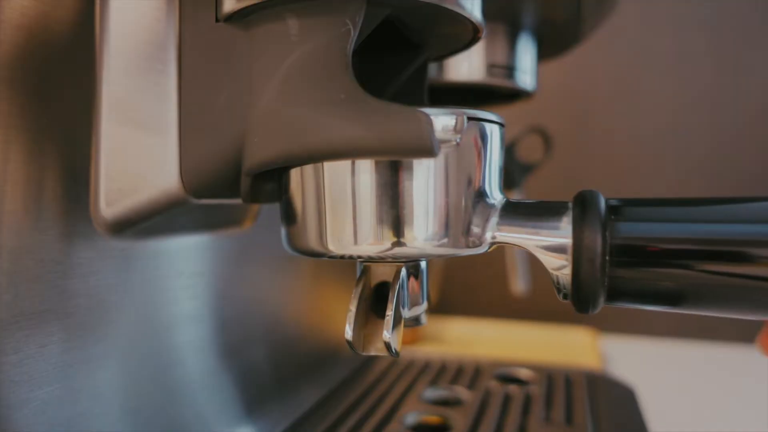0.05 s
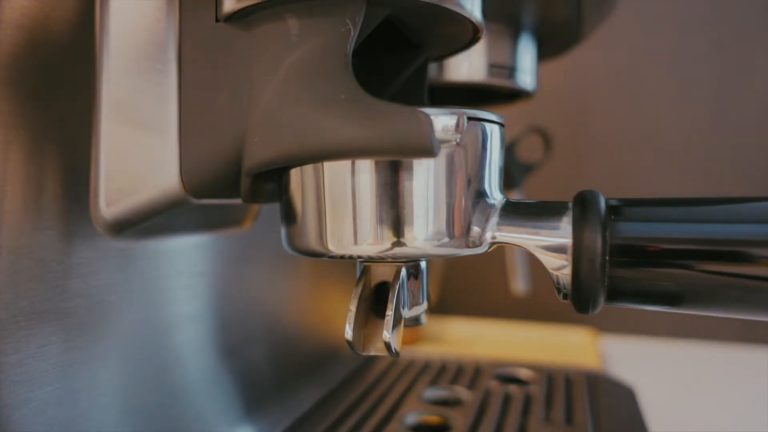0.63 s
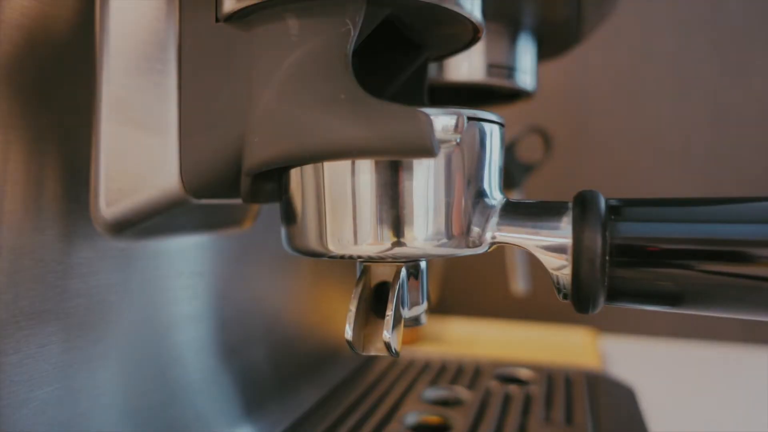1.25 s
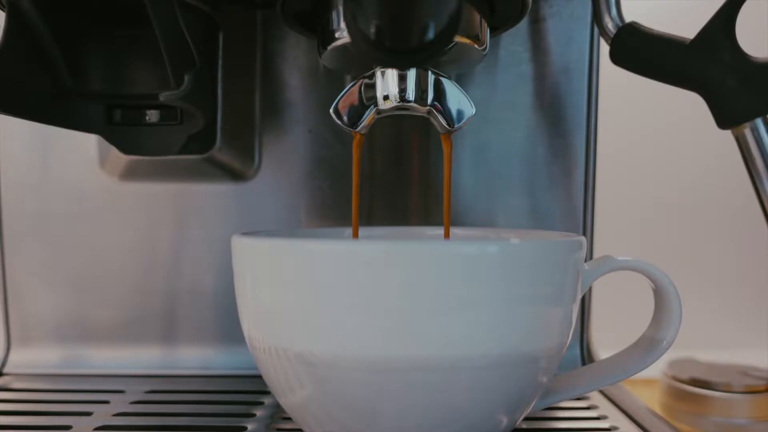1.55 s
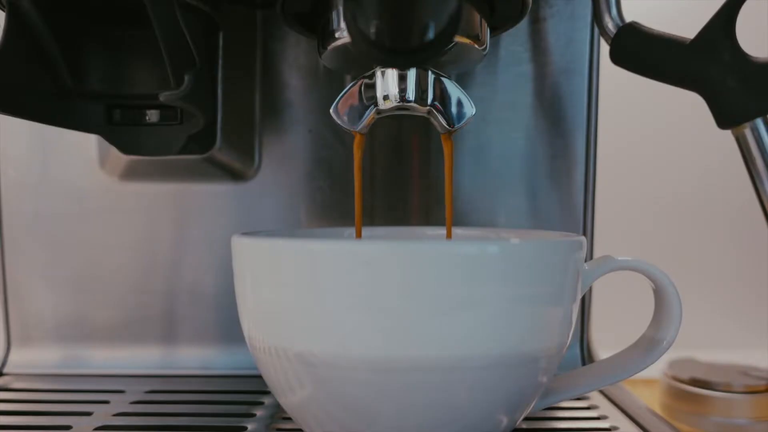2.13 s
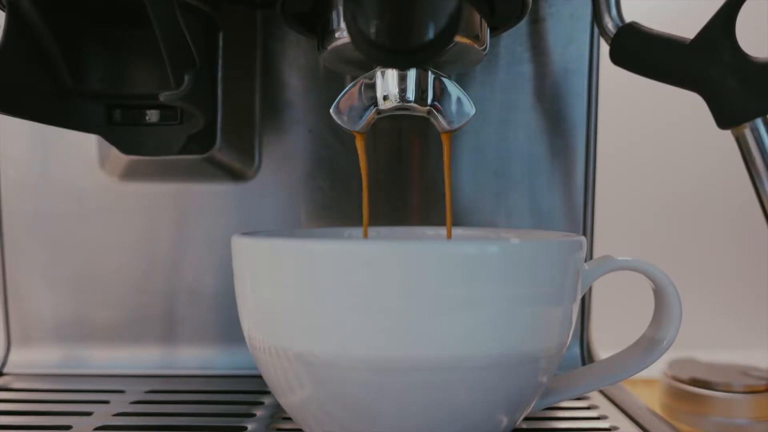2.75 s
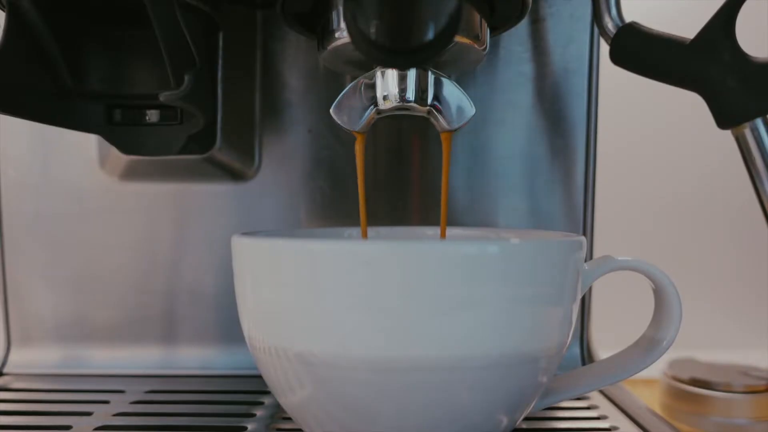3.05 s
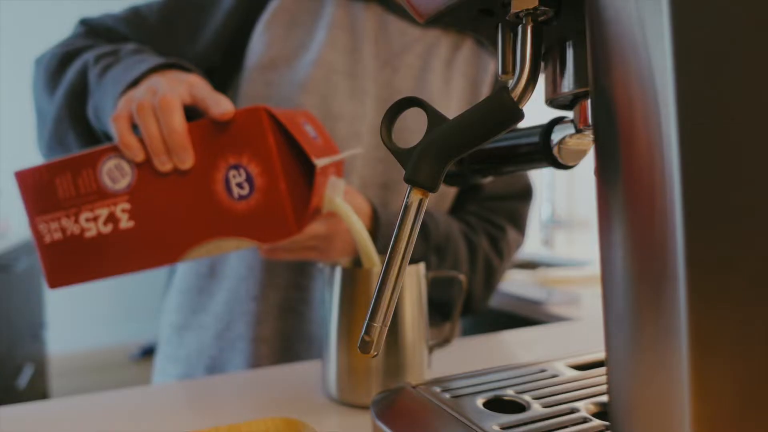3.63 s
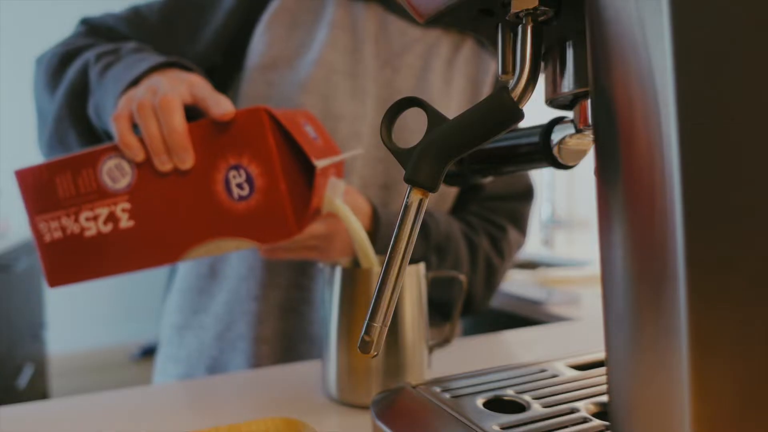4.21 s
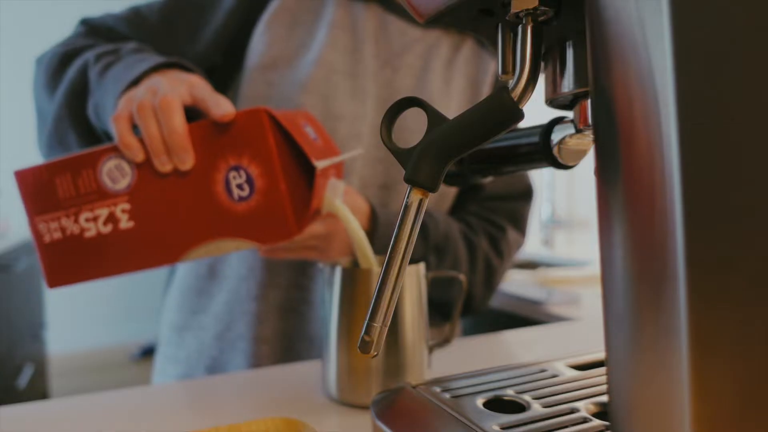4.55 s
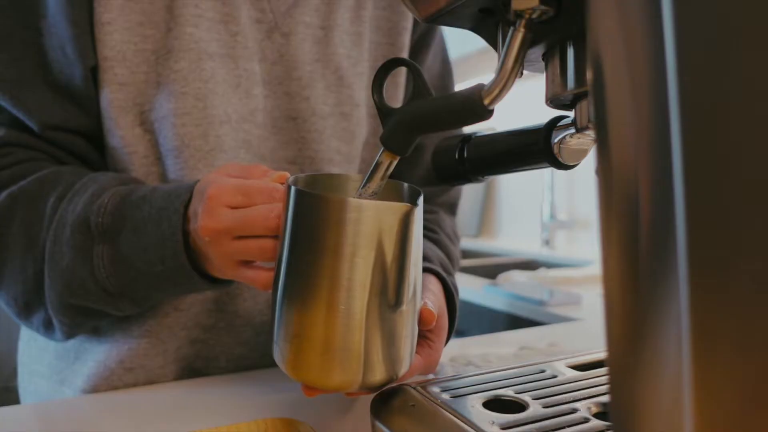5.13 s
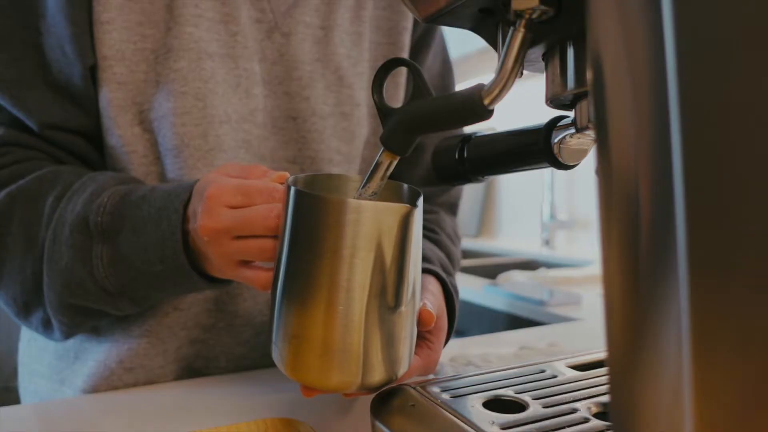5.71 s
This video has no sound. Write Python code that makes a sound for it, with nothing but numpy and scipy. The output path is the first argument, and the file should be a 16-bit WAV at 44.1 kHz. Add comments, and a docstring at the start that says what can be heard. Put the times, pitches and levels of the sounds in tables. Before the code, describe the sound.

An electric coffee grinder crunches beans loudly, its whine rising and then sagging. It cuts straight to an espresso machine pump, humming and lightly rattling while coffee plips into a cup. After another cut, milk glugs faintly into a steel jug. Finally a steam wand hisses and sputters in the milk, with two quick clusters of pump thumps. Everything is heard close up in a quiet kitchen.

```python
"""A kitchen with an espresso machine, where a milk coffee is made in four abruptly joined scenes.
Beans fracture between a grinder's burrs while its gears whine at their meshing rate. A vibration pump
drives its case at the mains frequency, and bubbles resonate in the filling cup. Milk glugs from a carton
into a steel jug. A steam jet hisses in the milk, collapsing bubbles ring the jug, and the pump feeds
the boiler in short thumps. The room rumbles faintly throughout."""
import sys
import numpy as np
from scipy import signal
from scipy.fft import rfft, irfft, next_fast_len
from scipy.io import wavfile
from scipy.ndimage import uniform_filter1d, map_coordinates

SR = 44100
rng = np.random.default_rng(int(sys.argv[2]) if len(sys.argv) > 2 else 0)


def file_out(sig):
    """Save sig as 16-bit WAV at sys.argv[1]."""
    # one column per channel
    cols = np.atleast_2d(sig).T
    # limit, then scale
    lim = np.clip(cols, -1, 1)
    pcm = np.round(lim * 32767).astype(np.int16)
    wavfile.write(sys.argv[1], SR, pcm)


N = 259037

# Span of a scene; the pour lies between brewing and steaming: (start [s], end [s])
GRINDING, BREWING, STEAMING = (0.00093, 1.473), (1.473, 3.304), (4.887, 5.9)
# Diffuse share of the sound field: (frequency [Hz], side minus mid [dB])
BREW_DIFFUSION = [(60, -38), (150, -29.5), (380, -17.5), (950, -16.5), (2380, -16), (5980, -9), (15000, -8)]
POUR_DIFFUSION = [(60, -24.5), (130, -28), (290, -14.5), (640, -1.5), (1410, 1), (3100, -7.5), (6820, -1),
                  (15000, -4.5)]
STEAM_DIFFUSION = [(60, -38), (220, -36), (400, -13.5), (700, -4.5), (1300, -19), (4400, -14), (8500, -4.5),
                   (11500, -11), (16000, -27.5)]


def grinder():
    """Brittle fracture of beans excites the housing; meshing gears radiate harmonics of the tooth rate."""
    # Gear speed, lower when beans load the burrs: (time [s], tooth rate [Hz])
    gear_speed = [(0, 421.8), (.14, 575), (.23, 775), (.5, 897.4), (.67, 896), (.74, 856), (.97, 857.4),
                  (1.13, 761), (1.48, 690.6)]
    # Radiation of a gear harmonic by the body: (frequency [Hz], level [dB])
    radiation = [(450, -32), (640, -31), (745, -21.5), (880, -21), (1000, -21), (1180, -27), (1450, -24),
                 (1600, -34), (2100, -33), (2450, -26), (2800, -25), (3000, -38), (3500, -35)]
    # Spectra of churning and cracking beans: (frequency [Hz], relative density [dB])
    churn_spectrum = [(30, -70), (55, -44.5), (96, -14), (183, -23), (260, -6.5), (345, -12), (480, -7),
                      (620, -4.5), (900, -3), (1250, -4.5), (2200, -13.5), (2900, -31.5), (4800, -86.5)]
    crunch_spectrum = [(800, -28), (1500, -6), (2000, -5), (2650, -3), (3100, -7.5), (4200, -7.5),
                       (5100, -5), (6200, -16), (8000, -19), (10000, -27), (13000, -29.5), (15500, -40.5)]
    # Housing resonances: (frequency [Hz], bandwidth [Hz], gain [dB])
    housing_modes = [(93.2, 7.7, -14.5), (271.3, 19, -1), (494.4, 26, -3), (1142, 63, -7.5)]
    # Diffuse share: (frequency [Hz], side minus mid [dB])
    diffusion = [(60, -38.5), (180, -31), (550, -19), (1650, -19), (4970, -21.5), (15000, -9.5)]
    full_mesh_hz, grip_s = 700, .013
    tooth_hz, = curves(gear_speed)
    bite = wobble(30.03)
    churn = amp(-21 + .5 * bite) * coloured(grains(rate=2700, spread_db=2, t60=.014), churn_spectrum)
    body = amp(-27 + 1.9 * wobble(22)) * resonate(grains(rate=400, spread_db=4, t60=.012), housing_modes)
    cracks = grains(rate=1700, spread_db=.5, t60=.026)
    crunch_db = -20 + 4 * np.log2(tooth_hz / tooth_hz.max())  # faster burrs crunch louder
    crunch = amp(crunch_db + 1.5 * bite + .26 * wobble(70)) * coloured(cracks, crunch_spectrum)
    tooth_hz = tooth_hz * (1 + .014 * wobble(28) + .008 * wobble(300))  # beans brake the burrs unevenly
    phase = 2 * np.pi * np.cumsum(tooth_hz) / SR
    # slow teeth mesh softly: the upper harmonics come in with speed
    soft_db = 27 * np.minimum(np.log2(tooth_hz / full_mesh_hz), 0)
    whine = np.zeros(N)
    for k in range(1, 5):
        harmonic_db = along(radiation, k * tooth_hz) + max(k - 2, -.5) * soft_db + 3.4 * wobble(40)
        whine += amp(harmonic_db) * np.sin(k * phase)
    whine *= np.clip(clock() / .11, 0, 1)  # swells as the gears take up the load
    whine *= unit(amp(-1.5 * bite))  # and dips at each hard bite
    envelope = (1 - np.exp(-clock() / grip_s)) * during(GRINDING, fade=.0044)
    return stereo((churn + body + crunch + whine) * envelope, diffusion, left_db=3)


def pump():
    """Forced vibration: a piston strikes once each mains cycle, so the case hums and loose parts rattle."""
    # Response of the case: (mains harmonic [1], gain [dB])
    case_harmonics = [(1, -15), (2, -19), (3, -13), (4, -18), (5, -10), (6, -2), (7, 0), (8, -1), (9, -1),
                      (10, -10), (11, -12), (12, -3), (13, -14), (14, -20), (15, -18), (16, -24), (17, -19),
                      (18, -17), (19, -19), (20, -21), (21, -25), (22, -14), (23, -16), (24, -14),
                      (25, -23)]
    # Flexing panels: (frequency [Hz], bandwidth [Hz])
    panel_modes = [(350, 70), (1050, 110), (1380, 140)]
    # Spectra of loose parts and of water forced through coffee: (frequency [Hz], relative density [dB])
    rattle_spectrum = [(1100, -27), (1550, -6), (2000, -3.5), (2750, -2), (3300, 1.5), (3850, -5),
                       (4400, -3), (5100, -6), (6000, -9), (8600, -8), (10500, -15), (14500, -36),
                       (16000, -34.5)]
    flow_spectrum = [(40, -13), (250, -9), (440, 0), (650, -6), (1000, -9), (1400, -7), (4000, -28)]
    # Metal fittings: (frequency [Hz], bandwidth [Hz], gain [dB])
    fitting_modes = [(1340, 95, 4), (1910, 120, -4), (3365, 52, -6.5), (3710, 52, -6), (5090, 43, -8),
                     (8050, 64, -16), (8640, 140, -18.5)]
    mains_hz, blow_lag_s, ease_db_per_s = 60.04, .0028, .8
    strokes = piston(mains_hz)
    case = [(30, -61.5)] + [(k * mains_hz, db) for k, db in case_harmonics] + [(1800, -33), (4000, -69)]
    blows = convolve(np.pad(-strokes, (round(blow_lag_s * SR), 0)), struck(case))
    hum = unit(all_pass(blows, panel_modes))  # each panel returns its share of the blow late
    t = clock(SR // 20)
    chatter = (1 - np.exp(-t / .0014)) ** 2 * amp(-60 * t / .062)
    repeating = unit(convolve(strokes, even(chatter * rng.standard_normal(len(t)))))
    repeating = filtered(repeating, lambda hz: 1 / np.hypot(1, (hz / 7000) ** 2))
    irregular = unit(convolve(strokes, chatter) * rng.standard_normal(N))  # new with every stroke
    rattle = coloured(repeating + amp(-5) * irregular, rattle_spectrum)
    fittings = resonate(convolve(strokes, chatter * rng.standard_normal(len(t))), fitting_modes)
    # as pressure builds, a loose steel tray joins in and the pump quietens
    tray = resonate(strokes, [(1410, 75, 0)]) * (1 - np.exp(-since(1.98) / .1))
    easing = amp(-ease_db_per_s * since(BREWING[0]))
    buzz = easing * (amp(-21) * hum + amp(-33.5) * rattle + amp(-39) * fittings + amp(-37.5) * tray)
    flow = amp(-37) * coloured(rng.standard_normal(N), flow_spectrum)
    return stereo((buzz + flow) * during(BREWING, fade=.0046), BREW_DIFFUSION, left_db=-2)


def piston(rate_hz):
    """Periodic impacts form a train of nearly equal, band-limited impulses."""
    times = .0039 + np.arange(int(N / SR * rate_hz)) / rate_hz
    sizes = amp(.2 * rng.standard_normal(len(times)))
    taps = np.floor(times * SR)[:, None] + np.arange(-7, 9)
    offset = taps - times[:, None] * SR
    pulses = sizes[:, None] * np.sinc(offset) * np.sinc(offset / 8)
    return np.bincount(taps.astype(int).ravel(), pulses.ravel(), N)[:N]


def coffee():
    """Air entrainment: falling coffee traps bubbles that resonate in the cup."""
    # Bubbles: (time [s], peak level [dB], frequency [Hz])
    plips = [(1.612, -24.5, 2440), (1.848, -28.5, 1110), (2.132, -20.5, 1520), (2.171, -23.5, 2120),
             (2.192, -17.5, 1960), (2.343, -15, 1910), (2.568, -28.5, 1860), (2.618, -22.5, 2090),
             (2.842, -22.5, 1600), (2.968, -22, 1760), (3.127, -18, 1330), (3.187, -27.5, 1300),
             (3.271, -22, 1430), (3.286, -16, 1504)]
    cup = np.zeros(N)
    for s, db, hz in plips:
        add(cup, s, amp(db) * bubble(hz, t60=.035, attack=.0011, rise=.047, splash=.55, splash_t60=.05))
    return (stereo(cup, BREW_DIFFUSION, left_db=4) + amp(-9) * room(cup)) * during(BREWING, fade=.006)


def steam():
    """Jet noise sputters at the wand's tip; bubble collapse excites the jug's modes; the milk rumbles."""
    # Spectra of the jet, the foam and the rumbling milk: (frequency [Hz], relative density [dB])
    jet_spectrum = [(2650, -32), (4500, -13.5), (5450, -10.5), (5840, -6), (7290, -5.5), (7980, -8.5),
                    (8830, -2), (10600, -6.5), (11100, -4.5), (12400, -7.5), (12900, -2), (14600, -5.5),
                    (15400, -6), (16000, -17.5)]
    froth_spectrum = [(450, -32), (640, -40), (740, -10), (830, -18), (1100, -12), (1300, -1.5), (1700, -2),
                      (2400, -8), (3000, -6), (4500, -2.5), (6000, -29.5)]
    boil_spectrum = [(24, -51), (40, -14), (129, -9), (161, 9.5), (200, -21.5), (311, -4.5), (452, -20),
                     (600, -29), (780, -50), (1320, -120)]
    # Resonances of the steel jug: (frequency [Hz], bandwidth [Hz], gain [dB])
    jug_modes = [(3023, 190, -1.5), (3425, 590, -2.5), (4023, 280, -0.5), (4250, 390, 1.5)]
    jug_db, jet_db = wand_levels()
    sputter = wobble(60)
    fizz = walls(grains(rate=6300, spread_db=3, t60=.005), t60=.042)
    jet = amp(jet_db + 1.1 * sputter) * coloured(fizz, jet_spectrum)
    foam = walls(grains(rate=1800, spread_db=5, t60=.0118), t60=.064)
    froth_db = (jug_db + jet_db) / 2 - 6.5 + .7 * sputter + .89 * wobble(30)
    froth = amp(froth_db) * coloured(foam, froth_spectrum)
    collapses = walls(grains(rate=1100, spread_db=0, t60=.011), t60=.041)
    ring = amp(jug_db + 1.3 * wobble(40)) * resonate(resonate(collapses, jug_modes), [(3700, 2200, 0)])
    boil = amp(-54.5 + 1.6 * wobble(14)) * coloured(rng.standard_normal(N), boil_spectrum)
    return stereo((jet + froth + ring + boil) * during(STEAMING, fade=.001), STEAM_DIFFUSION, left_db=0)


def wand_levels():
    """Jug and jet levels [dB]: near the surface the tip hisses more and couples less to the jug."""
    # Spurts of hiss: (centre time [s], duration [s], lift [dB])
    spurts = [(5.038, .05, 5.5), (5.12, 0.074, 7.5), (5.203, 0.045, 5.5), (5.324, 0.035, 6.5),
              (5.383, 0.029, 5.5), (5.506, 0.081, 5), (5.645, .09, 6.5), (5.761, 0.061, 8)]
    # Large collapsing bubbles that make the jug's ring flare: (time [s], lift [dB])
    collapses = [(4.932, 6), (5.158, 3.5), (5.227, 5.5), (5.405, 5), (5.431, 5.5), (5.49, 3), (5.685, 4.5)]
    flare_s, ease_off_s, fall_db_per_s = .018, 5.81, 140.5
    spurt_db = sum(db * .5 ** ((2 * (clock() - s) / length) ** 2) for s, length, db in spurts)
    flare_db = sum(db * (1 - np.exp(-since(s) / .002)) * np.exp(-(since(s) / flare_s) ** 2)
                   for s, db in collapses)
    fall_db = fall_db_per_s * since(ease_off_s)
    jug_db = -31 + flare_db - .4 * spurt_db - .77 * fall_db
    jet_db = -29.5 + spurt_db - fall_db
    return jug_db, jet_db


def boiler_feed():
    """Impact excitation: piston strokes in threes clack and leave the chassis in damped vibration."""
    # Strokes: (time [s], thump peak [dB], clack peak [dB])
    strokes = [(5.261, -26.5, -23), (5.276, -21, -17.5), (5.290, -17.5, -26), (5.777, -28, -27),
               (5.79, -19.5, -16.5), (5.806, -18.5, -23.5)]
    # Chassis resonances: (frequency [Hz], relative level [dB], t60 [s])
    chassis_modes = [(110.7, -13, 0.17), (194, -6, 0.115), (233.5, 5, 0.1), (259.8, 1.5, 0.22),
                     (305, -13, 0.024), (386, -14.5, 0.23)]
    # Clack resonances: (frequency [Hz], bandwidth [Hz], gain [dB])
    clack_modes = [(703, 43, 0), (1096, 170, -1.5), (1720, 390, -6.5), (2570, 900, -8)]
    thumps, t = np.zeros(N), clock(SR // 4)
    ring = sum(amp(db - 60 * t / t60) * np.sin(2 * np.pi * hz * t) for hz, db, t60 in chassis_modes)
    ring *= 1 - np.exp(-t / .0027)
    for s, thump_db, clack_db in strokes:
        clack = resonate(burst(.044), clack_modes)
        add(thumps, s, amp(thump_db) * unit_peak(ring) + amp(clack_db) * unit_peak(clack))
    return stereo(thumps, STEAM_DIFFUSION, left_db=.5)


def milk():
    """Bubble resonance over a thinning stream: the carton gulps air, and small bubbles decay sooner."""
    # Gulps and splashes: (time [s], peak level [dB], frequency [Hz], splash share [1])
    glugs = [(3.458, -49, 2570, .7), (3.508, -52, 2790, .4), (3.555, -42.5, 2730, 0.46),
             (3.597, -40.5, 2810, .5), (3.671, -50, 3600, 0.56), (3.747, -52, 2900, 0.34),
             (3.803, -32.5, 1774, 0.15), (3.826, -42, 2280, 0.5), (3.866, -48, 2570, .5),
             (4.074, -46.5, 5330, .15), (4.161, -52.5, 3040, .45), (4.589, -60, 3690, .35),
             (4.822, -54.5, 1685, .8)]
    # Milk running into the jug: (frequency [Hz], relative density [dB])
    stream_spectrum = [(500, -17), (900, 8.5), (1500, -1), (2700, 5.5), (4000, -11), (6500, -22),
                       (9000, -28), (16000, -38)]
    full_db, thin_db, settle_at_s, settle_s = -65.5, -78, 3.88, .25
    drops_per_s, drop_hz = 9, 4800
    start, end = BREWING[1], STEAMING[0]
    jug = np.zeros(N)
    for s, db, hz, splash in glugs:
        glug = bubble(hz, t60=85 / hz, attack=.0042, rise=.046, splash=splash, splash_t60=.066)
        add(jug, s, amp(db) * glug)
    stream_db = thin_db + (full_db - thin_db) * np.exp(-since(settle_at_s) / settle_s)
    loudest_gulp_s = max(glugs, key=lambda row: row[1])[0]
    slosh = amp(-53) * (1 - np.exp(-since(loudest_gulp_s) / .022)) * np.exp(-since(loudest_gulp_s) / .084)
    trickle = coloured(grains(rate=200, spread_db=6.5, t60=.095), stream_spectrum)
    stream = (amp(stream_db) + slosh) * during((start, end), fade=.01) * trickle
    # stray droplets grow fainter with the stream
    for when, size, pitch in rng.random((round(drops_per_s * (end - start)), 3)):
        s, hz = start + when * (end - start), drop_hz * 2 ** (pitch - .5)
        db = -61 + 8 * (size - .5) + np.interp(s, clock(), stream_db) - full_db
        add(jug, s, amp(db) * bubble(hz, t60=85 / hz, attack=.003, rise=.05, splash=.4, splash_t60=.04))
    return stereo(jug + stream, POUR_DIFFUSION, left_db=0) + amp(-15) * room(jug)


def bubble(hz, t60, attack, rise, splash, splash_t60):
    """A bubble is a damped oscillator of rising pitch, with a puff of spray around that pitch; peak 1."""
    t = clock(SR // 4)
    glide = 1 + rise * np.minimum(t / t60, 1)
    ring = np.sin(2 * np.pi * hz * np.cumsum(glide) / SR) * amp(-60 * t / t60)
    spray = resonate(resonate(burst(splash_t60), [(hz, hz * .4, 0)]), [(hz, hz * .5, 0)])
    return unit_peak(((1 - splash) * ring + splash * unit_peak(spray)) * (1 - np.exp(-t / attack)))


def kitchen():
    """Ambient noise: a low, nearly steady rumble fills the room."""
    # Rumble: (frequency [Hz], relative density [dB])
    rumble_spectrum = [(15, -67.5), (25, -40.5), (44, -17.5), (66, -18), (84, -22), (99, -11.5), (117, -11),
                       (185, -12), (223, -4.5), (394, -25.5), (754, -27), (988, -33.5), (1160, -28.5),
                       (2280, -42), (16000, -59)]
    rumble = amp(-51.5 + .76 * wobble(9)) * coloured(rng.standard_normal(N), rumble_spectrum)
    return stereo(rumble, POUR_DIFFUSION, left_db=2.5)


def room(x):
    """Reverberation: each frequency dies away at its own rate."""
    # Reverberation time: (frequency [Hz], t60 [s])
    decay_times = [(200, .3), (2000, 0.64), (10000, 0.13)]
    hz, t, noise = signal.stft(rng.standard_normal((2, SR // 2)), SR, nperseg=256)
    tail = signal.istft(noise * amp(-60 * t / along(decay_times, hz)[:, None]), SR, nperseg=256)[1]
    return signal.fftconvolve(x[None], tail / np.linalg.norm(tail[0]), axes=1)[:, :N]


def walls(x, t60):
    """Comb filtering by dense early reflections from close steel panels."""
    echoes = burst(t60, size=SR // 10)
    echoes[0] += 1.1 * np.linalg.norm(echoes)  # the direct path
    return convolve(x, even(np.pad(echoes, (SR // 400, 0))))


def stereo(x, diffusion, left_db):
    """Scattering decorrelates left and right; the treble leans to the nearer side."""
    scatter = rfft(burst(.023))
    scatter = np.roll(irfft(scatter / np.abs(scatter)), SR // 200)
    side = filtered(convolve(x, scatter), lambda hz: amp(along(diffusion, hz)))
    lean = lambda hz: amp(np.outer([.5, -.5], left_db * hz / (hz + 1200)))
    return filtered(np.array([x + side, x - side]), lean)


def grains(rate, spread_db, t60):
    """Shot noise: tiny random bursts, rate per second, add in energy; rms 1."""
    onsets = rng.random(N) < rate / SR
    energy = onsets * amp(spread_db * np.clip(rng.standard_normal(N), -2, 2)) ** 2
    envelope = np.sqrt(np.abs(convolve(energy, amp(-60 * clock(SR // 10) / t60) ** 2)))
    return unit(envelope * rng.standard_normal(N))


def burst(t60, size=SR // 4):
    """Exponentially decaying noise, 60 dB down after t60 seconds."""
    return rng.standard_normal(size) * amp(-60 * clock(size) / t60)


def resonate(x, modes):
    """Modal superposition: x through (frequency [Hz], bandwidth [Hz], gain [dB]) resonances; rms 1."""
    return unit(filtered(x, lambda f: sum((-1) ** k * amp(db) * 1j * f * w / (c * c - f * f + 1j * f * w)
                                          for k, (c, w, db) in enumerate(modes))))


def all_pass(x, modes):
    """Group delay around each (frequency [Hz], bandwidth [Hz]) mode, with no change of level."""
    return filtered(x, lambda f: np.prod([(c * c - f * f - 1j * w * f) / (c * c - f * f + 1j * w * f)
                                          for c, w in modes], axis=0))


def struck(spectrum, size=8192):
    """Minimum-phase impulse response of a body with this (frequency [Hz], gain [dB]) spectrum."""
    cepstrum = irfft(np.log(amp(along(spectrum, np.fft.rfftfreq(size, 1 / SR)))))
    cepstrum[1:size // 2] *= 2
    cepstrum[size // 2 + 1:] = 0
    return irfft(np.exp(rfft(cepstrum)))


def even(response, width_hz=500):
    """Whitening: an impulse response loses its broad colour and keeps its fine comb; energy 1."""
    spectrum = rfft(response)
    power = uniform_filter1d(np.abs(spectrum) ** 2, max(3, int(width_hz * len(response) / SR)))
    flat = irfft(spectrum / np.sqrt(np.abs(power) + 1e-20), len(response))
    return flat / np.linalg.norm(flat)


def coloured(x, spectrum):
    """Spectral shaping of x by (frequency [Hz], gain [dB]) points; rms 1."""
    return unit(filtered(x, lambda hz: amp(along(spectrum, hz))))


def filtered(x, response):
    """Linear filtering: the spectrum of x times a frequency response."""
    size = x.shape[-1]
    padded = next_fast_len(size + SR // 4)
    return irfft(rfft(x, padded) * response(np.fft.rfftfreq(padded, 1 / SR)), padded)[..., :size]


def convolve(x, response):
    """Convolution of x with an impulse response."""
    return signal.fftconvolve(x, response)[:N]


def add(track, s, sound):
    """Superposition of a sound on the track at time s."""
    part = track[round(s * SR):][:len(sound)]
    part += sound[:len(part)]


def wobble(rate):
    """Smooth random modulation, rate knots a second."""
    return map_coordinates(rng.standard_normal(int(N * rate / SR) + 4), [clock() * rate])


def during(span, fade):
    """A gate: 1 inside the span, 0 outside, with ramps of fade seconds."""
    return np.clip((clock() - span[0]) / fade + .5, 0, 1) * np.clip((span[1] - clock()) / fade + .5, 0, 1)


def along(points, hz):
    """Interpolation of (frequency [Hz], value) points on a log axis."""
    knots_hz, values = np.transpose(points)
    return np.interp(np.log(hz + 1), np.log(knots_hz + 1), values)


def curves(rows):
    """Interpolation of each column after the time, one value per sample."""
    times, *columns = np.transpose(rows)
    return [np.interp(clock(), times, column) for column in columns]


def clock(size=N):
    """Seconds at each sample."""
    return np.arange(size) / SR


def since(s):
    """Seconds elapsed after time s, 0 before it."""
    return np.maximum(clock() - s, 0)


def amp(db):
    """Decibels to gain."""
    return 10 ** (np.asarray(db) / 20)


def unit(x):
    """x at rms 1."""
    return x / np.sqrt(np.mean(x ** 2) + 1e-20)


def unit_peak(x):
    """x at peak 1."""
    return x / np.abs(x).max()


def scene():
    """Superposition of grinding, brewing, pouring and steaming on the room's rumble."""
    return grinder() + pump() + coffee() + milk() + steam() + boiler_feed() + kitchen()


def record(dry):
    """Band limiting: a fourth-order bass roll-off and a steep treble cut."""
    low_hz, top_hz = 38, 15850
    high_pass = lambda hz: hz ** 4 / np.hypot(hz ** 4, low_hz ** 4)
    low_pass = lambda hz: np.clip((top_hz - hz) / 200 + .5, 0, 1)
    return filtered(dry, lambda hz: high_pass(hz) * low_pass(hz))


dry = scene()
out = record(dry)
file_out(out)
```